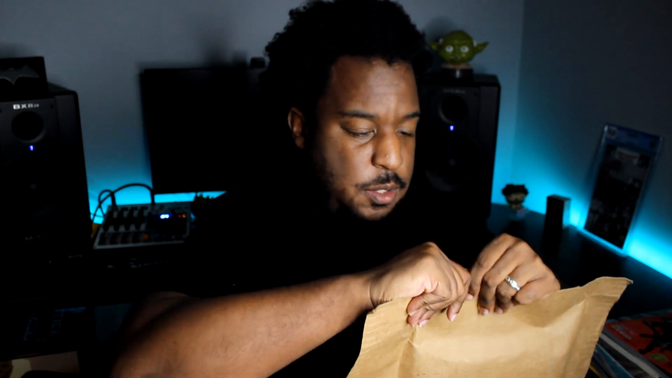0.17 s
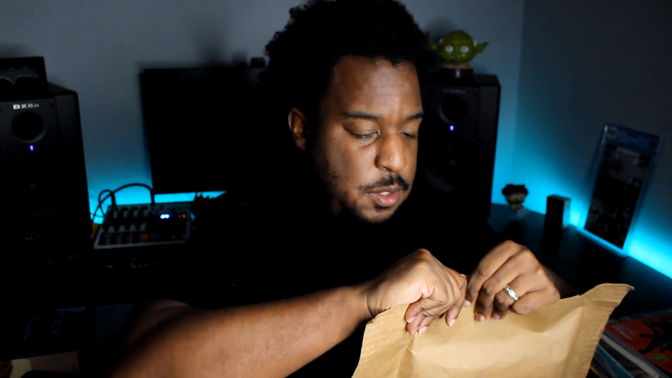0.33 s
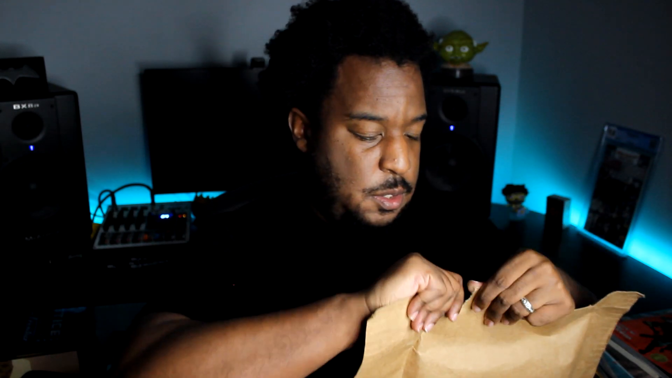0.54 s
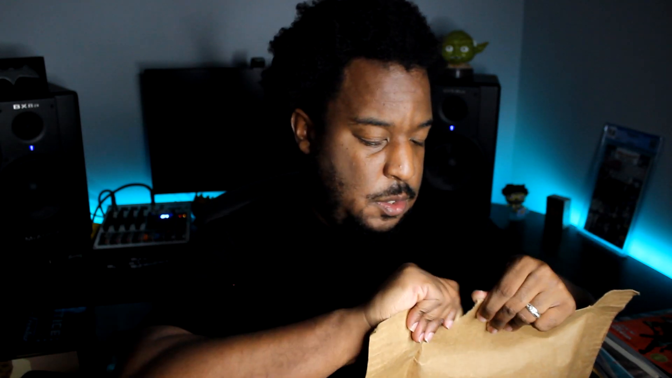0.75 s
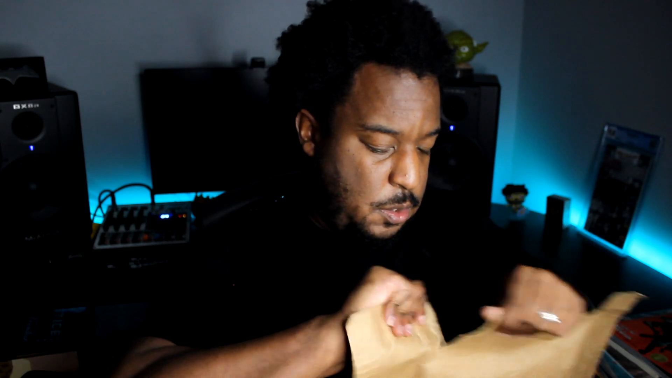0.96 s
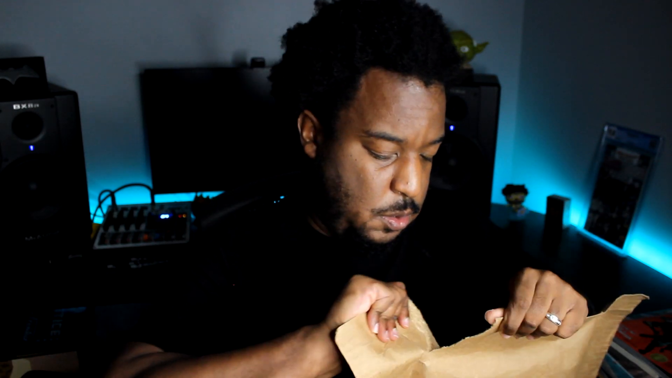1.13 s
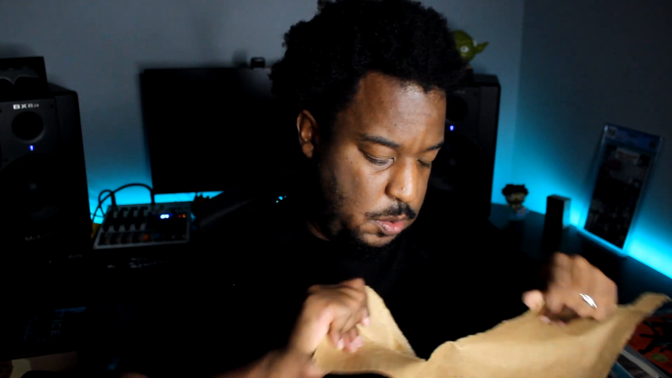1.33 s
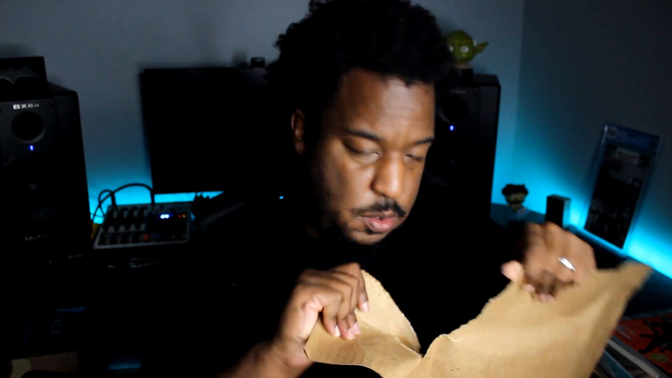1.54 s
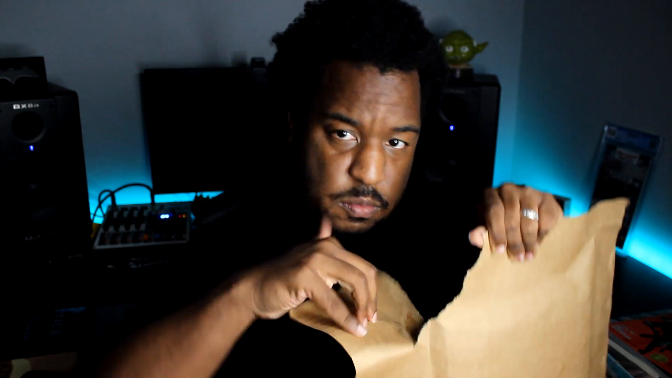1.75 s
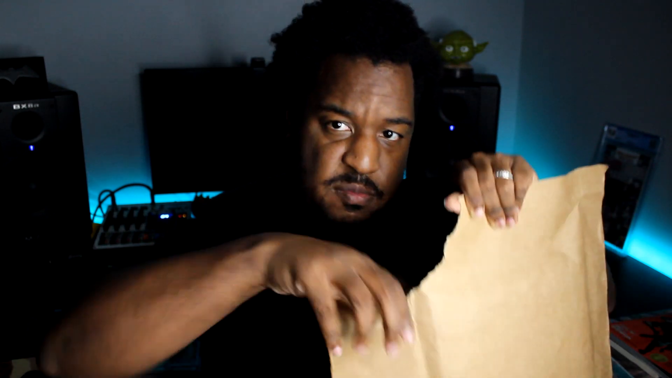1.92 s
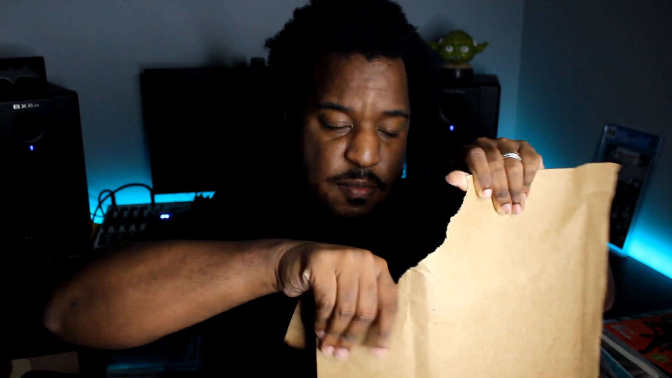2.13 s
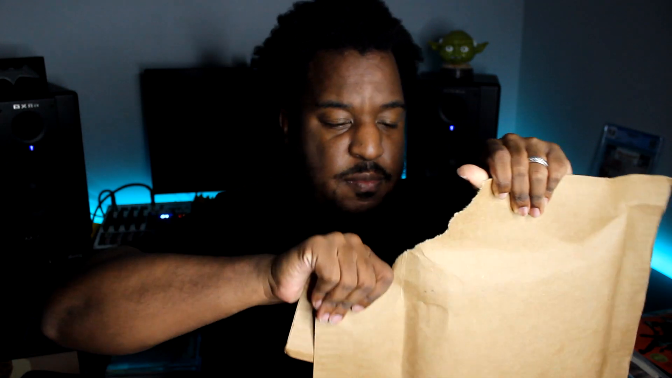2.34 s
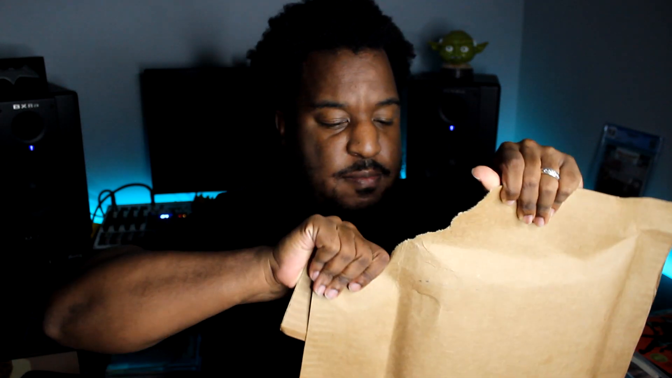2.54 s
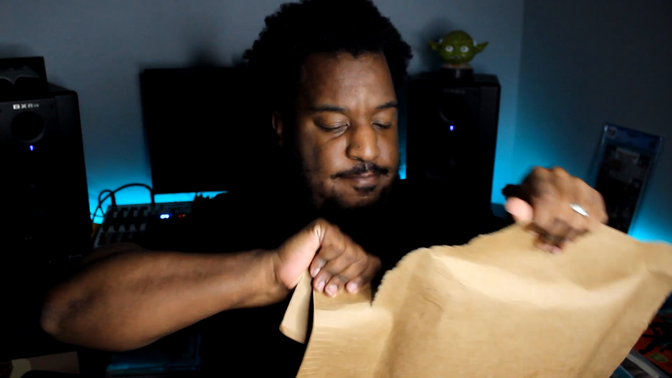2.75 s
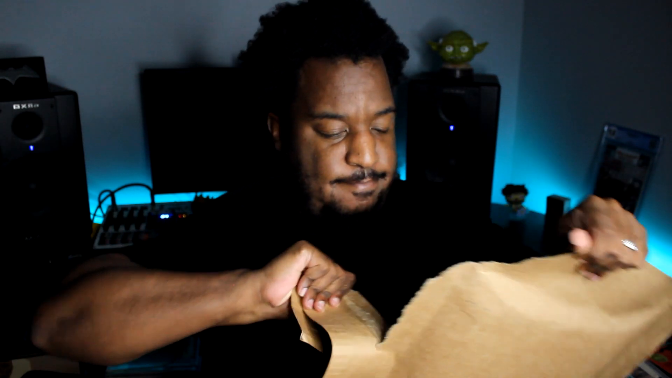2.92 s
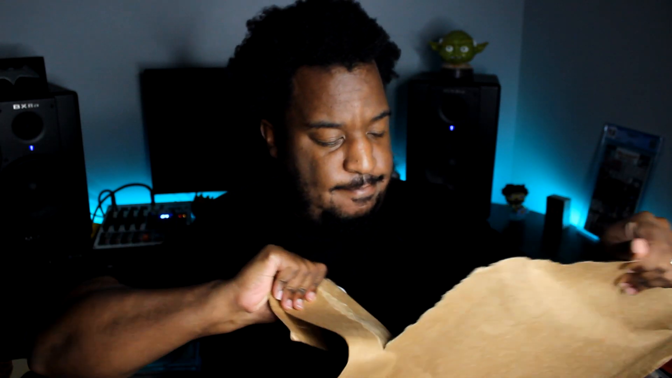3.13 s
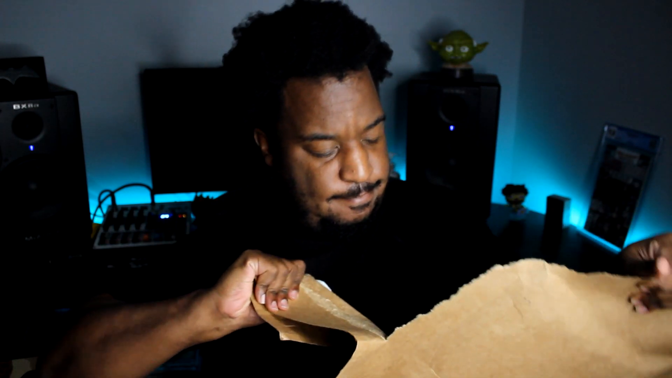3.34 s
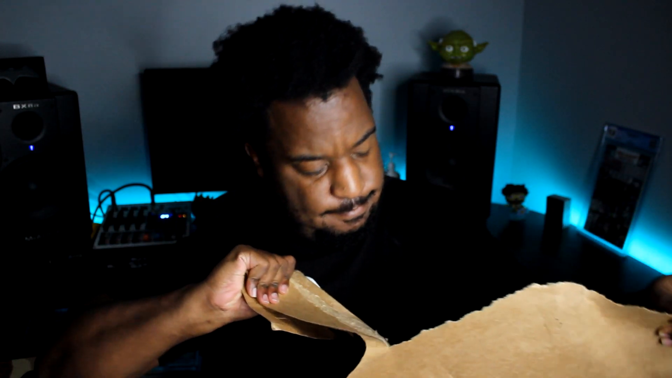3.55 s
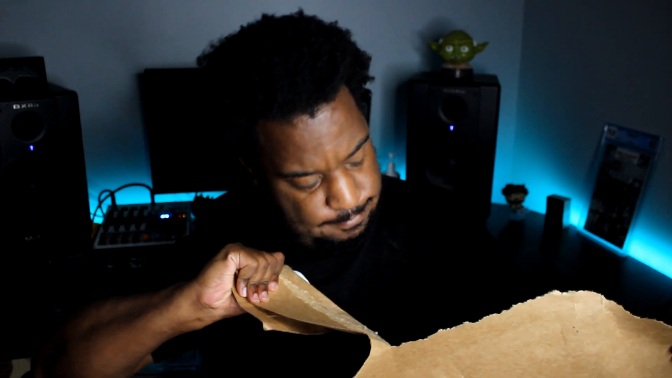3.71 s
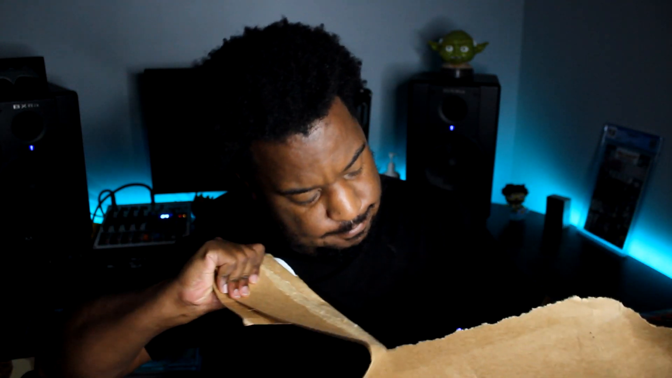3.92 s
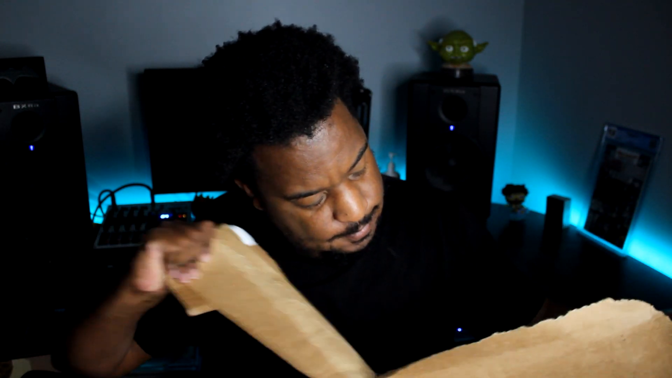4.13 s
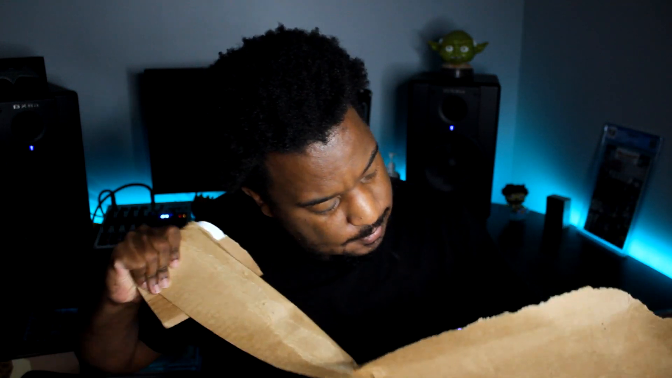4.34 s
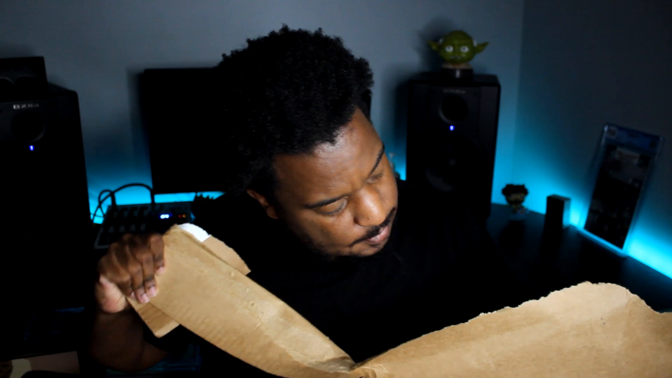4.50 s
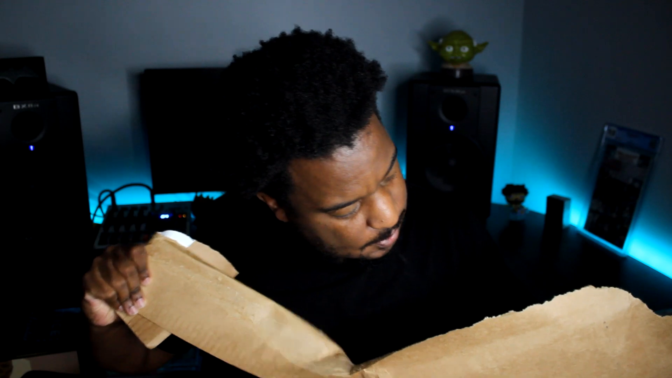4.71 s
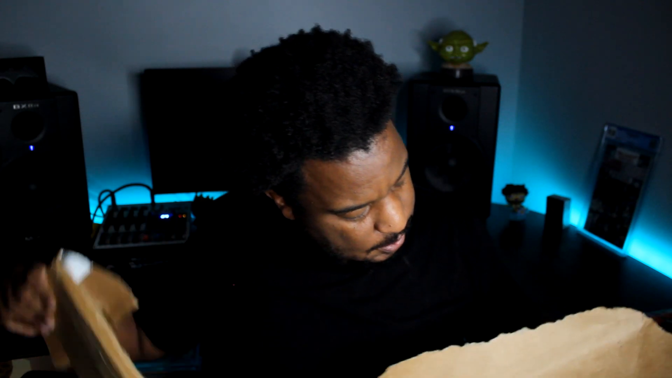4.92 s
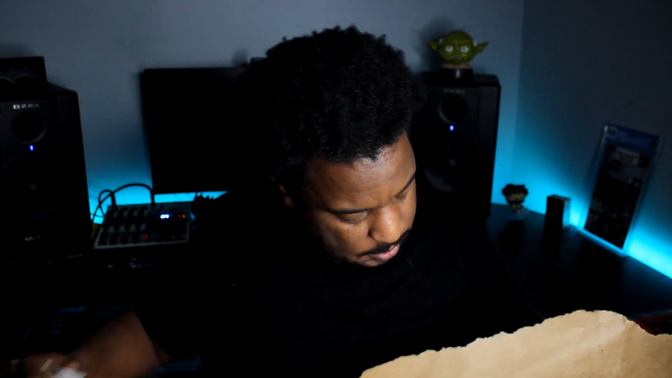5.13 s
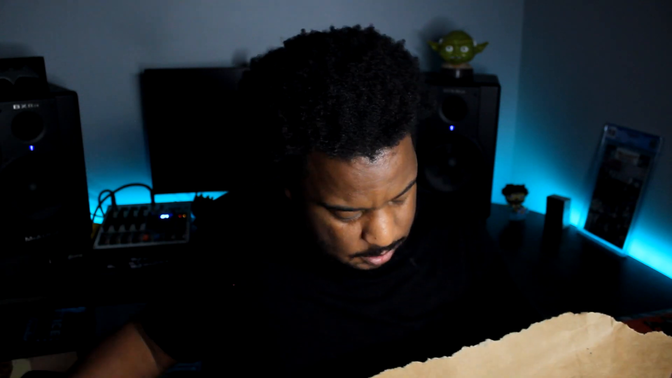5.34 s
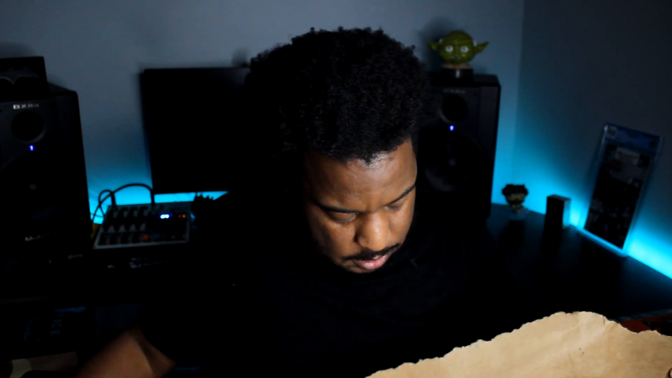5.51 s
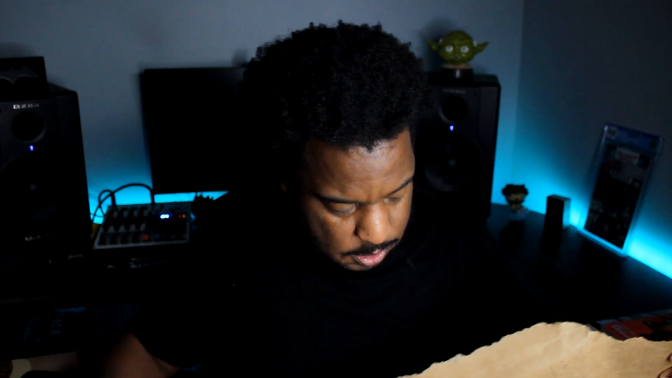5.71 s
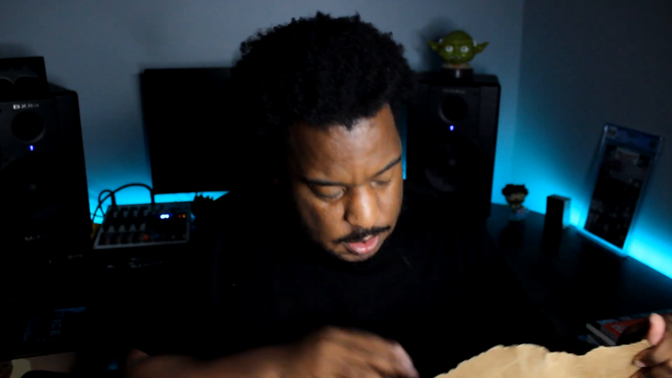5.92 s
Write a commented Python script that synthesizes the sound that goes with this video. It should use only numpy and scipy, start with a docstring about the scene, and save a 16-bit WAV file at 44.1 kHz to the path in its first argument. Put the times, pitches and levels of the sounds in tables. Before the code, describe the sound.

A close microphone in a small room picks up thick paper being torn by hand over faint rumble, hiss and tiny paper ticks. At 0 s a short grip crackle fades. Four short, bright, fibrous rips come at about 0.45, 0.85, 1.0 and 1.25-1.5 s, the last longest. From 1.6 to 2.3 s the hands regrip: rustle, sharp crinkles and hollow buckling pops, strongest near 2.1 s. The long tear starts taut and quiet around 2.35 s, swells loud and deep by 2.7 s, and continues in overlapping pulls at 3.0, 3.4, 3.8 and 4.0 s, losing low body. Thinner jerks at 4.4, 4.65 and 4.85 s carry pops and hard snaps. After 5 s only soft sliding and small crinkles remain, growing near 5.85 s. At about 5.98 s the sleeve crumples and slaps down with a dull, quickly fading desk thud.

```python
"""A paper shipping sleeve is torn open by hand at a desk, close to one microphone in a small room:
four short rips, then one long tear in several pulls, all made of fibre snaps ringing through the sheet.
Between them the grip changes with rustle, crinkles (dying runs of snaps) and hollow pops (swelling tones).
At the end the loose strip slides away and the sleeve bumps down: a crumple, a slap and decaying desk modes.
Faint paper ticks and shaped room noise lie beneath; decaying random echoes make the room."""
import sys
import numpy as np
from scipy import signal
from scipy.fft import rfft, irfft
from scipy.io import wavfile
from scipy.ndimage import uniform_filter1d, minimum_filter1d

SR = 44100
rng = np.random.default_rng(int(sys.argv[2]) if len(sys.argv) > 2 else 0)


def transcribe(signal):
    """Save signal, clipped to [-1, 1], as a 16-bit WAV file at the path in sys.argv[1]."""
    frames = np.atleast_2d(signal).T
    limited = np.clip(frames, -1, 1)
    pcm = np.round(limited * 32767).astype(np.int16)
    wavfile.write(sys.argv[1], SR, pcm)


N = 267510
TIME = np.arange(N) / SR


def amp(db):
    """Decibels to gain."""
    return 10 ** (np.asarray(db) / 20)


def unit(x):
    """Scales to rms 1."""
    return x / np.sqrt(np.mean(x ** 2) + 1e-20)


def read(points, hz):
    """Reads a table on a log-frequency axis."""
    f, value = np.transpose(points)
    return np.interp(np.log(hz + 1), np.log(f + 1), value)


def add(mix, s, sound):
    """Mixes a sound in at a given second."""
    part = mix[max(round(s * SR), 0):][:len(sound)]
    part += sound[:len(part)]


def low_cut(x, hz, order=2):
    """Thins out the deep bass below a given frequency."""
    return signal.sosfilt(signal.butter(order, hz, "highpass", fs=SR, output="sos"), x)


def ring(colour, lo_hz, hi_hz, size=2048, order=8):
    """Response of energy 1: the causal ring of a colour, cut to one band with smooth edges."""
    hz = abs(np.fft.fftfreq(size, 1 / SR)) + 1
    log_gain = np.log(amp(read(colour, hz)))
    causal = np.exp(np.conj(signal.hilbert(log_gain)))  # minimum phase
    band = 1 / ((1 + (lo_hz / hz) ** order) * (1 + (hz / hi_hz) ** order))
    # a short lead leaves room for the band's pre-ring
    response = np.roll(np.fft.ifft(causal * band).real, size // 32)[:size // 2]
    response *= signal.windows.tukey(size // 2, 1 / 16)
    return response / np.linalg.norm(response)


def wander(length, seconds):
    """Smooth chance of rms 1 that changes over the given time."""
    width = max(int(seconds * SR), 2)
    return unit(uniform_filter1d(rng.standard_normal(length), width, mode="wrap"))


def snaps(length, per_s, spread_db):
    """Fibres break at random moments, most of them weakly and a few hard."""
    breaks = rng.random(length) < per_s / SR
    strength = amp(spread_db * np.minimum(rng.exponential(1, length), 4))
    polarity = rng.choice([-1, 1], length)
    return unit(breaks * strength * polarity / np.sqrt(per_s))


def crunch(decay_s):
    """A dense run of nearly equal snaps that dies away."""
    t = TIME[:SR // 10]
    return snaps(len(t), 16000, 1.5) * np.exp(-t / max(decay_s, 1e-4))


# Every stroke gathers force, holds it and lets go.
ATTACK_CURVE, RELEASE_CURVE = 1.04, 1.18  # powers of time: above 1, force builds late and eases off gently


def force(attack, hold, release):
    """Force of one stroke in dB below its top; the release is the time to fall by 20 dB."""
    attack, hold, release = np.maximum([attack, hold, release], 1e-3)
    t = np.arange(0, attack + hold + 3 * release, 1 / SR)
    rise = np.clip(t / attack, 1e-3, 1) ** ATTACK_CURVE
    fall = (np.maximum(t - attack - hold, 0) / release) ** RELEASE_CURVE
    return 20 * (np.log10(rise) - fall)


UNEVEN_DB, UNEVEN_S = 0.4, 0.04  # the force is never quite even
# dB of change for each dB of force: the edge rasps on when the rest has died
FLAP_FOLLOW, RASP_FOLLOW, FIZZ_FOLLOW = 1.47, 0.86, 1.05


def stroke(row, colour, snaps_per_s, spread_db, clump_db, clump_s):
    """Clumps of breaking fibres shake the sheet, denser when the force is high."""
    s, attack, hold, release, level_db, flap_db, rasp_db, fizz_db = row
    force_db = force(attack, hold, release)
    length = len(force_db)
    # the paper catches and lets go
    clumps = amp(clump_db * wander(length, clump_s) + UNEVEN_DB * wander(length, UNEVEN_S))
    breaks = snaps(length, snaps_per_s * amp(.5 * force_db), spread_db)
    fibres = unit(breaks * clumps) * amp(level_db)
    parts = [
        (flap_db, FLAP_FOLLOW, 30, 800),  # the whole panel flaps low
        (0, 1, 800, 3800),  # the paper nearby crackles
        (rasp_db, RASP_FOLLOW, 3800, 7000),  # the edge rasps
        (fizz_db, FIZZ_FOLLOW, 7000, 17000),  # single fibres fizz
    ]
    out = np.zeros(N)
    for part_db, follow, lo_hz, hi_hz in parts:
        driven = fibres * amp(part_db + follow * force_db)
        add(out, s, signal.fftconvolve(driven, ring(colour, lo_hz, hi_hz)))
    return out


def flex(x, patchy_db, size=512):
    """The bending sheet keeps shifting its resonances: patches of colour come and go."""
    z = signal.stft(x, nperseg=size)[2]
    patches = uniform_filter1d(rng.standard_normal(z.shape), size=4, axis=0)
    patches = unit(uniform_filter1d(patches, size=12, axis=1))
    return signal.istft(z * unit(amp(patchy_db * patches)), nperseg=size)[1][:N]


# colour of the steady room noise: f/Hz, relative level per Hz/dB
FLOOR = [(15, -34), (25, -39), (116, 2.5), (389, -2.5), (482, 0.5), (871, -3.5), (970, -0.5), (1110, -2.5),
         (2490, -8), (5280, -4.5), (7300, -13), (11500, -12.5), (15500, -20)]
FLOOR_DB = -55.5  # rms


def room_noise():
    """Faint steady rumble and hiss: random noise shaped by its colour."""
    shape = amp(read(FLOOR, np.fft.rfftfreq(N, 1 / SR)))
    return amp(FLOOR_DB) * unit(irfft(rfft(rng.standard_normal(N)) * shape, N))


# ring of the room: f/Hz, t60/s
ROOM = [(150, 0.34), (500, 0.28), (1400, 0.18), (5000, 0.25), (12000, 0.14)]


def tail(size=256):
    """Dense reflections from desk and walls, each band dying at its own speed."""
    t = TIME[:SR // 2]
    taps = rng.standard_normal(len(t)) * (rng.random(len(t)) < 3000 / SR) * (t > .003)
    hz, at, z = signal.stft(taps, SR, nperseg=size)
    decay = amp(-60 * at / read(ROOM, hz)[:, None])
    response = signal.istft(z * decay, SR, nperseg=size)[1]
    return response / np.linalg.norm(response)


def room(x, count=8):
    """As the hands move, one pattern of reflections hands over to the next."""
    place = TIME / TIME[-1] * (count - 1)
    shares = (np.sqrt(np.maximum(1 - abs(place - k), 0)) for k in range(count))
    return sum(signal.fftconvolve(x * share, tail())[:N] for share in shares)


TICKS_PER_S, TICKS_DB = 28, -66.5  # mean rate, dry level


def ticks():
    """Small creases settle at random moments: sparse, bright snaps."""
    creases = snaps(N, TICKS_PER_S, 1.8)
    return amp(TICKS_DB) * signal.fftconvolve(creases, ring(RIP_COLOUR, 4500, 15000))[:N]


# modes of the desk under the landing sleeve: f/Hz, relative level/dB, t60/s
DESK_MODES = [(143, -5.5, 0.066), (206, -11, 0.13), (370, -5, .1), (480, -17, .04), (567, 6, 0.044),
              (766, -6, 0.073), (920, 1.5, 0.037), (1113, -3, 0.069), (1460, -18, .08)]
# the landing and its bounce: t/s, relative level of the desk's ring/dB, relative level of the slap/dB
LANDINGS = [(5.978, -6.5, -6.5), (6.0108, -33, -14)]


def landing():
    """A papery slap, and the dull ring of the package on the desk, which takes a moment to build."""
    out, t = np.zeros(N), TIME[:SR // 4]
    body = sum(amp(db - 60 * t / t60) * np.sin(2 * np.pi * hz * t) for hz, db, t60 in DESK_MODES)
    body *= 1 - np.exp(-t / 0.0024)
    for s, body_db, slap_db in LANDINGS:
        add(out, s, amp(body_db) * body)
        slap = signal.fftconvolve(crunch(decay_s=0.0016), ring(RIP_COLOUR, 250, 2200))
        add(out, s - .002, amp(slap_db) * slap)
    return out


# panels of the sleeve that buckle with a hollow pop: t/s, level/dB, f/Hz, swell time to the peak/s
POPS = [(0.4237, -21.5, 593, 0.0013), (0.709, -21.5, 620, 0.0014), (1.762, -22, 1620, 0.003),
        (1.779, -26, 810, 0.0058), (2.018, -21, 410, 0.0025), (2.021, -26, 195, 0.0059),
        (2.077, -30, 1043, 0.0055), (2.106, -11.5, 1080, 0.0024), (2.106, -17, 550, 0.0014),
        (2.195, -20, 1080, 0.0015), (2.197, -25.5, 260, 0.0021), (2.208, -17.5, 480, 0.0012),
        (2.320, -17, 450, 0.0019), (2.322, -21, 1050, .0015), (2.324, -37, 174, 0.0073),
        (4.281, -15, 557, 0.0032), (4.442, -17, 1284, 0.0037), (4.684, -17.5, 1300, 0.0054)]


def pops():
    """A panel flips over and swings for a few cycles: a sine that swells and dies."""
    out, t = np.zeros(N), TIME[:SR // 10]
    for s, db, hz, swell in POPS:
        u = t / max(swell, 1e-4)
        envelope = (u * np.exp(1 - u)) ** 1.1
        add(out, s, amp(db) * envelope * np.sin(2 * np.pi * hz * t))
    return out


# creases that snap and sudden slips of the tear: t/s, relative level/dB, upper edge f/Hz, decay to 1/e/s
CRINKLES = [(0.227, -44, 20000, 0.0033), (0.3642, -48, 9000, 0.0033), (0.4475, -27, 12100, 0.0056),
            (0.558, -14.5, 9000, 0.022), (0.709, -27, 5000, 0.0023), (0.858, -6.5, 10000, 0.0054),
            (0.902, -12, 9100, .005), (1.025, -11, 19100, .014), (1.207, -28, 10000, 0.003),
            (1.7097, -16, 7570, 0.0057), (1.771, -12, 5970, 0.0072), (1.805, -10.5, 9200, 0.014),
            (1.969, -5.5, 10400, 0.0045), (2.105, -27, 1500, .002), (2.195, -26, 3080, .002),
            (2.208, -22, 3320, 0.0024), (2.213, -16, 3700, 0.0062), (2.321, -24.5, 3200, 0.0054),
            (2.487, -13, 12000, .0012), (2.569, -26, 14000, 0.0011), (2.594, -10.5, 13000, 0.0018),
            (3.406, -21, 9000, .003), (4.527, -18, 6050, 0.013), (4.563, 0, 7900, 0.00056),
            (4.693, -14.5, 7000, 0.0043), (4.716, -19, 8000, 0.0051), (4.785, -13, 8000, 0.0042),
            (4.811, -15, 9100, 0.0049), (4.855, -8, 9300, 0.0087), (5.2825, -37.5, 6000, 0.0036),
            (5.3758, -38, 5000, .002), (5.553, -32.5, 4250, 0.00092), (5.714, -24, 5500, 0.0031),
            (5.7452, -23.5, 4370, 0.0042), (5.889, -22, 4000, 0.0027)]


def crinkles():
    """The paper gives way in a quickly dying run of snaps."""
    out = np.zeros(N)
    for s, db, edge_hz, decay in CRINKLES:
        burst = signal.fftconvolve(crunch(decay), ring(TEAR_COLOUR, 0.21 * edge_hz, edge_hz))
        add(out, s - .0014, amp(db) * burst)  # early by the lead of the ring
    return out


# colour of handled paper, then of sliding and crumpling paper: f/Hz, relative level per Hz/dB
HANDLING_COLOUR = [(60, -35), (200, -8.5), (430, 2), (620, 1.5), (850, 2), (1200, -4.5), (1600, 2),
                   (1950, 0.5), (3100, -2.5), (3600, -3), (5400, 0.5), (7800, -6.5), (11700, -7),
                   (15500, -30)]
SOFT_COLOUR = [(60, -42), (250, -19.5), (420, -14.5), (800, -12.5), (1250, -4.5), (1550, -0.5), (2300, -1),
               (2850, 0), (4000, -3.5), (5700, -0.5), (8000, -15), (11500, -21.5), (15500, -44)]
# changes of grip: t/s, attack/s, hold/s, release/s,
# crackle drive level/dB, then relative to it flap level/dB, rasp level/dB, fizz level/dB
GRIPS = [ (0.0, 0.00076, 0.005, 0.096, -21, -15, -1.5, -22), (0.415, .006, 0.013, .06, -53, 12, 6, 0),
         (0.701, 0.0056, .012, .06, -42, 5, -4, -27), (0.786, 0.07, .015, .03, -34.5, -12, 6, 0),
         (1.599, 0.13, 0.1, .08, -37, -9, -1, -10), (1.74, .025, .005, 0.046, -22, -15, -6, -20),
         (1.788, .02, 0.0073, 0.094, -22, -4, -8.5, -17), (1.937, 0.03, .003, 0.081, -21.5, -14, 1, -12),
         (2.06, 0.015, 0.013, 0.1, -39, -4, 5, -11), (2.105, .004, .006, 0.11, -41.5, 9.5, -14, -22),
         (2.192, 0.021, 0.0042, 0.12, -28.5, -1.5, -8, -23), (2.317, .004, 0.0095, .09, -38, 6, -11, -21), ]
# paper sliding over paper; the last row is the sleeve crumpling as it lands: the same columns
SLIDES_AND_CRUMPLE = [ (5.031, 0.036, 0.032, .12, -53, -2, -16, -16),
                      (5.247, 0.097, .055, 0.049, -37, -12.5, -8.5, -16),
                      (5.392, 0.016, 0.011, 0.046, -46.5, -6, 8, 5),
                      (5.637, 0.056, 0.2, .1, -35.5, -23.5, -8.5, -21),
                      (5.848, 0.028, 0.047, .05, -26.5, -15.5, -8.5, -22),
                      (5.921, 0.019, 0.021, .11, -23, -3.5, 0, -3),
                      (5.977, .004, 0.011, 0.13, -27.5, 7.5, -15, -20), ]


def rustling():
    """Fingers shift their grip, paper slides over paper, the landing sleeve crumples: dense soft snaps."""
    grips = sum(stroke(row, HANDLING_COLOUR, snaps_per_s=14000, spread_db=2.0, clump_db=1.8, clump_s=0.02)
                for row in GRIPS)
    slides_and_crumple = sum(
        stroke(row, SOFT_COLOUR, snaps_per_s=18000, spread_db=1.0, clump_db=1.4, clump_s=0.0055)
        for row in SLIDES_AND_CRUMPLE)
    return flex(grips + slides_and_crumple, patchy_db=3.0)


# colour of the sleeve when taut, in full tear and near the end: f/Hz, relative level per Hz/dB
TAUT_COLOUR = [(100, -38), (270, -22), (410, 7), (580, 12.5), (670, -18.5), (890, -2.5), (1100, 5.5),
               (1320, 11), (1700, 0.5), (3200, 0.5), (5800, 9.5), (7800, -4), (11500, -5.5), (15500, -25)]
TEAR_COLOUR = [(60, -62), (105, -39), (160, -8), (270, -8.5), (440, 6), (670, 1.5), (790, 0.5), (1400, 0),
               (2400, 0), (5600, -1.5), (8300, -11), (11000, -12), (13500, -18), (15500, -30)]
LAST_COLOUR = [(70, -43), (160, -20), (280, -28.5), (400, -11), (690, -15.5), (1080, -4), (1330, 0.5),
               (1650, -5), (3100, 0), (5400, 5.5), (8200, -5), (11500, -8), (13500, -19), (15500, -29)]


def pull(row, state):
    """One pull of the long tear: taut and hollow at first, broad at full speed, thinner near its end."""
    if state == "taut":
        return stroke(row, TAUT_COLOUR, snaps_per_s=12000, spread_db=2.0, clump_db=2.1, clump_s=0.0045)
    if state == "thin":
        return stroke(row, LAST_COLOUR, snaps_per_s=10000, spread_db=2.0, clump_db=1.5, clump_s=0.0053)
    broad = stroke(row, TEAR_COLOUR, snaps_per_s=7500, spread_db=1.94, clump_db=0.5, clump_s=0.0077)
    # once the sleeve gapes open it loses its deep body
    return low_cut(broad, hz=208) if state == "gaping" else broad


# colour of the paper in the short rips: f/Hz, relative level per Hz/dB
RIP_COLOUR = [(90, -69), (135, -34), (220, -10), (440, 2.5), (520, 1), (630, 5.5), (920, 0.5), (1600, 3),
              (2600, 0.5), (5300, 4.5), (8800, -7), (11000, -5), (13500, -11.5), (15500, -21)]
# strokes of the short rips: t/s, attack/s, hold/s, release/s,
# crackle drive level/dB, then relative to it flap level/dB, rasp level/dB, fizz level/dB
RIPS = [ (0.436, .012, 0.018, .06, -35.5, 6, 6.5, 5.5), (0.468, .024, 0.084, 0.092, -20, -4.5, 0, -4.5),
        (0.836, 0.021, 0.028, 0.18, -18.5, -5, -4.5, -2),
        (1.007, 0.025, 0.054, 0.14, -15.5, -2.5, -1.5, -5.5),
        (1.226, 0.031, 0.065, 0.067, -16.5, -11.5, -4.5, -6.5),
        (1.3, 0.026, 0.084, 0.15, -14, -7.5, 0.5, -5.5), ]
# pulls of the long tear: the same columns, then the state of the sleeve
PULLS = [ (2.328, 0.018, 0.031, 0.19, -35, -3, -11, -11, "taut"),
         (2.389, 0.13, .19, 0.15, -26.5, -6.5, 0.5, -0.5, "taut"),
         (2.658, 0.13, 0.19, .14, -13, -10, 0.5, -6, "deep"),
         (2.96, 0.066, 0.28, .12, -15, -11, 0.5, -6.5, "deep"),
         (3.39, 0.067, 0.29, 0.16, -15.5, -14.5, 0, -7, "gaping"),
         (3.824, 0.056, .08, 0.2, -15, -18.5, -1, -6, "gaping"),
         (3.979, 0.097, 0.18, 0.17, -13.5, -15, 0.5, -5, "gaping"),
         (4.411, 0.043, .1, 0.14, -17, -21, -2, -7, "thin"),
         (4.65, 0.062, 0.11, 0.12, -19.5, -21, 1.5, -6.5, "thin"),
         (4.832, 0.016, .015, .11, -15, -19.5, -1.5, -7, "thin"), ]


def tearing():
    """Short rips, then the long tear: hard strokes that break fibre after fibre."""
    rips = sum(stroke(row, RIP_COLOUR, snaps_per_s=8000, spread_db=1.5, clump_db=0.9, clump_s=0.0034)
               for row in RIPS)
    long_tear = sum(pull(row, state) for *row, state in PULLS)
    return flex(rips + long_tear, patchy_db=2.1)


def scene():
    """All the sounds reach one microphone, heard alike in both ears."""
    paper = tearing() + rustling() + crinkles() + ticks()
    knocks = low_cut(pops() + landing(), hz=90)
    reflections = room(amp(-11.5) * paper + amp(-7) * knocks)
    mono = paper + knocks + reflections + room_noise()
    return np.array([mono, mono])


EDGE_HZ = 15750  # upper limit of the sound


def record(dry, size=65):
    """A fast limiter holds the loudest peaks down; then the band limit."""
    needed = np.minimum(.96 / (abs(dry[0]) + 1e-9), 1)
    gain = uniform_filter1d(minimum_filter1d(needed, size), size)
    low_pass = signal.firwin(511, EDGE_HZ, window=("kaiser", 9), fs=SR)
    return signal.oaconvolve(dry * gain, low_pass[None], "same", axes=1)


dry = scene()
out = record(dry)
transcribe(out)
```